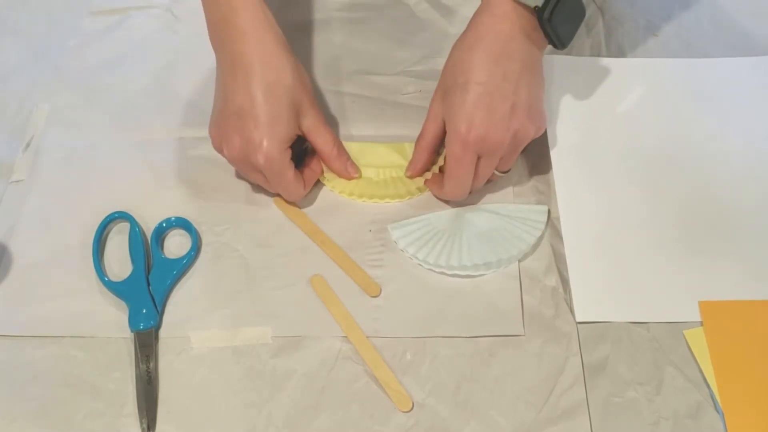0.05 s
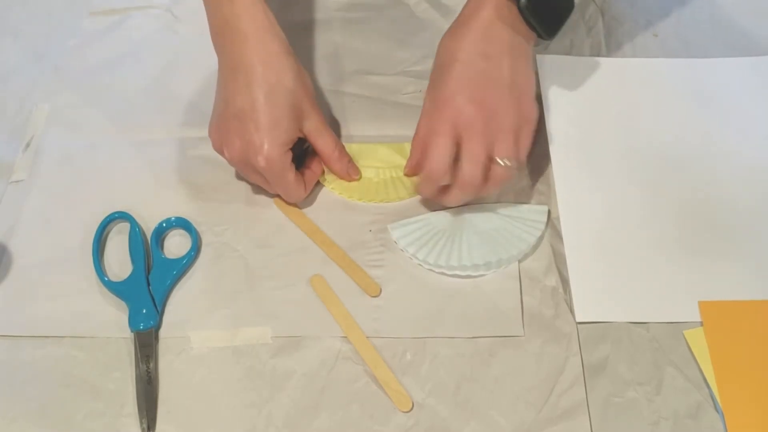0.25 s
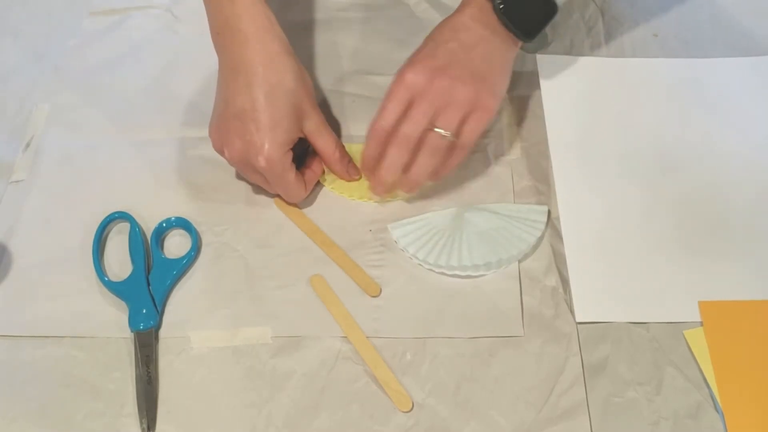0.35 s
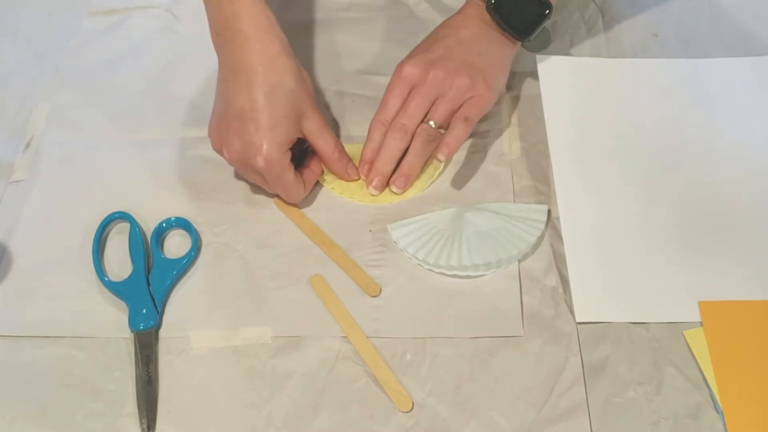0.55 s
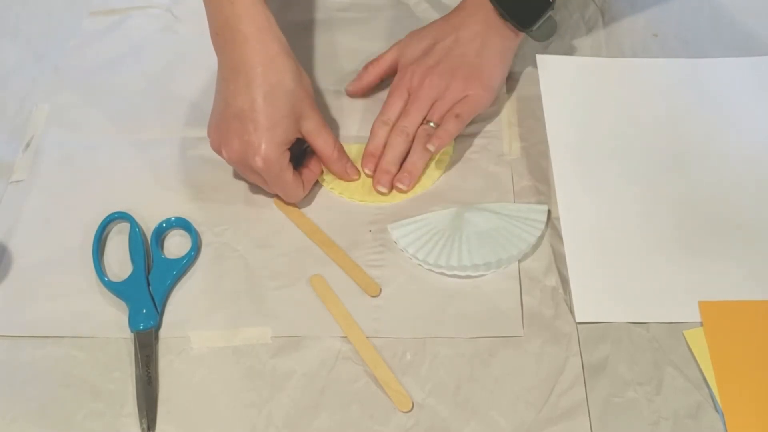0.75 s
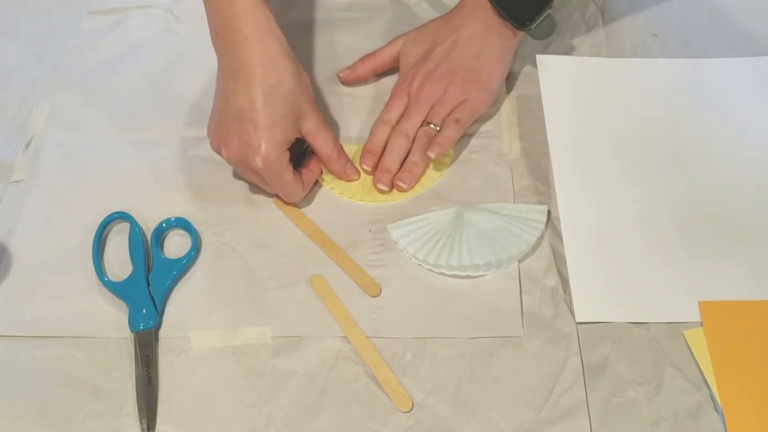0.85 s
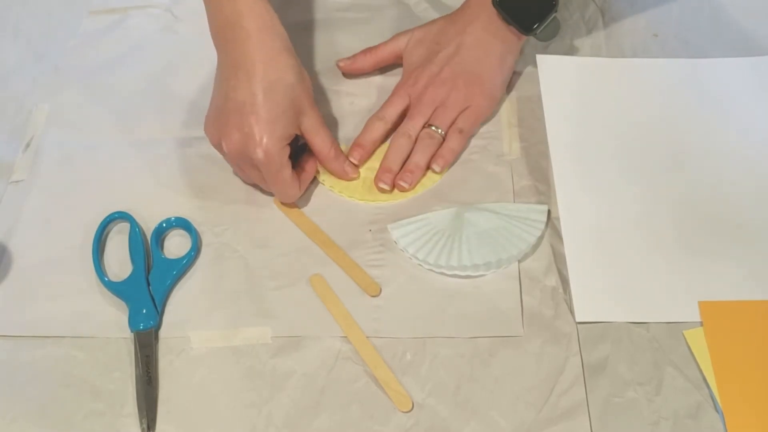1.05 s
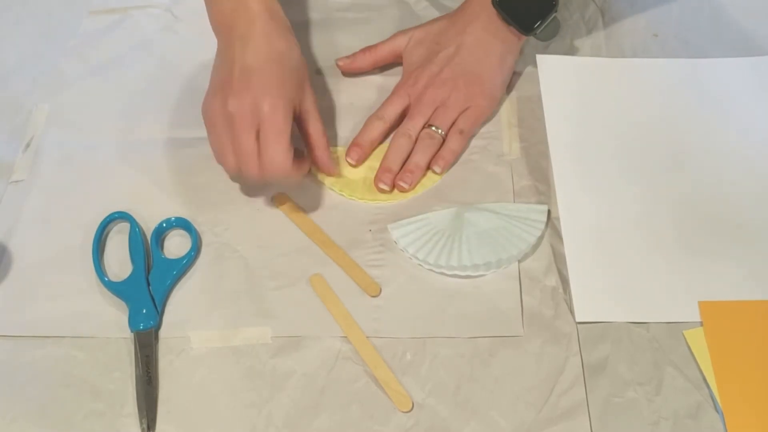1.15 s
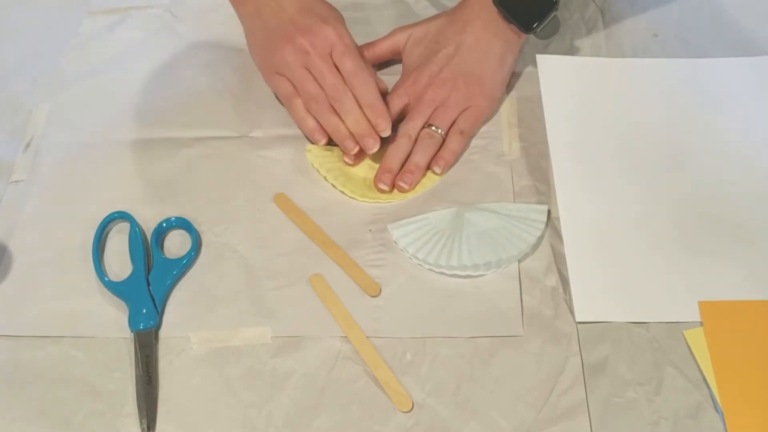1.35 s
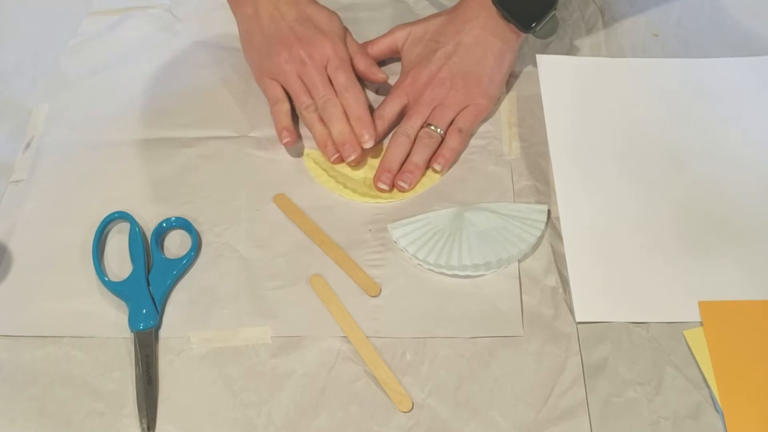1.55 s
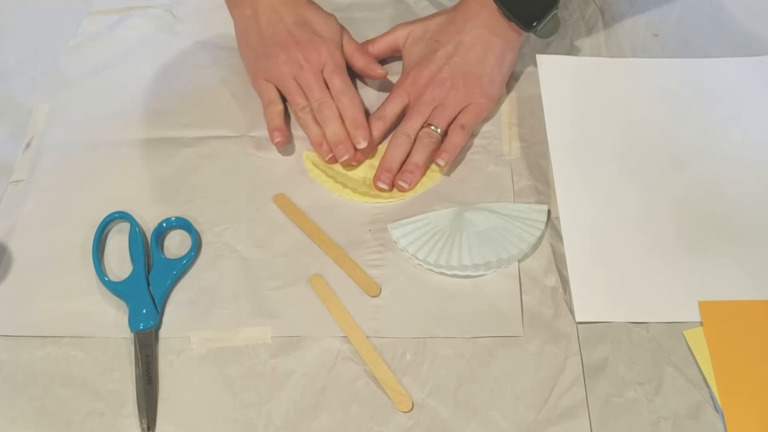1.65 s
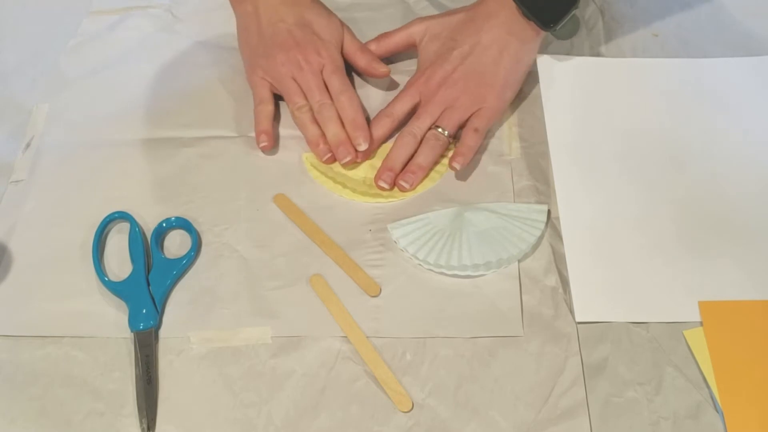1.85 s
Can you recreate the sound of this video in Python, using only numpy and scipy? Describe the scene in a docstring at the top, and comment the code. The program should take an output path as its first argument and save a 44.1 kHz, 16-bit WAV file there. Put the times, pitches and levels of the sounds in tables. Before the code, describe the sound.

A thin pleated paper cup crinkles as hands fold it on a table. Small sharp snaps cluster early, then lighter crackles and rubbing follow as fingers flatten it. It sounds close, in a quiet room with faint ventilation hum.

```python
"""A thin pleated paper cup is folded by hand and pressed flat on a table in a quiet room.
Pleats buckle with sharp snaps; fingers sliding over the paper raise a fine rustle of tiny crackles,
a dull rub against the table and a few short rasps along the folds.
Nearby surfaces return quick echoes, the room adds a short tail, and ventilation hums underneath."""
import sys
import numpy as np
from scipy import signal
from scipy.fft import rfft, irfft
from scipy.io import wavfile

SR = 44100
rng = np.random.default_rng(int(sys.argv[2]) if len(sys.argv) > 2 else 0)


def digitize_waveform(pressure):
    """Quantize a signal to 16-bit integers and store it at the path in sys.argv[1].

    Rows of a 2-D input are taken as channels; values are limited to [-1, 1].
    """
    field = np.atleast_2d(pressure).T
    bounded = np.clip(field, -1, 1)
    quanta = np.round(bounded * 32767).astype(np.int16)
    wavfile.write(sys.argv[1], SR, quanta)


N = 83790

# Buckling pleats: t/s, level/dB in each of five bands (before the band trims), pan/dB (left over right)
SNAPS = [(0.0742, -69, -61, -59, -70.0, -70.0, 5.0), (0.1008, -81.0, -63, -58, -64, -65, 8),
         (0.1274, -75, -66, -65, -72.0, -69, 6.0), (0.1441, -54, -52, -49, -45.5, -42, 3.0),
         (0.184, -47.5, -47, -74, -56, -54, 4.5), (0.198, -51, -47, -57, -50, -51, 1),
         (0.2171, -57, -48.5, -53, -49, -49, -3), (0.3916, -65, -31.5, -41, -40.5, -48, 3.5),
         (0.4115, -44.0, -42, -37, -42, -44, 14), (0.4189, -45, -46, -33, -40.0, -40, 1.0),
         (0.4232, -57, -37.5, -32, -38, -28, 3), (0.4332, -34.5, -28.0, -23.5, -26.5, -22.0, -2.5),
         (0.4942, -40, -29.0, -23.5, -30, -25.5, 5), (0.5489, -48, -41.5, -34, -42.0, -47, 1),
         (0.614, -47.5, -32.5, -30, -35, -37, 1.5), (0.6812, -38.5, -43, -34, -33, -49, 1.5),
         (0.6928, -39.5, -39, -50, -40, -49, -1), (0.7417, -54, -51, -48, -48.0, -50, 1),
         (0.7975, -51, -50.5, -44, -45, -50.0, -1), (0.8295, -50.5, -46, -57, -59, -50.0, 0),
         (0.8688, -56.0, -48, -55.0, -68, -59, 4), (0.8991, -49.0, -39, -37.5, -35.5, -42, 2.0),
         (0.913, -45.5, -47, -58, -55, -34, 4.5), (0.9238, -46.5, -39.5, -57, -50.0, -53, -4),
         (0.951, -48, -40, -55, -38.5, -36.5, 0), (0.9687, -74, -44.5, -43.5, -53, -44, 5),
         (1.0168, -55, -45.0, -46, -58, -57, 3.0), (1.0333, -73, -56, -60, -57, -66.0, -2),
         (1.059, -70, -44, -46, -51, -58, 1), (1.1166, -65, -38.5, -35, -42, -37.5, -7),
         (1.163, -48, -48, -45.0, -44.5, -42, -2), (1.2191, -40.5, -37, -28.5, -35.0, -31, 2.5),
         (1.2805, -74, -49, -47, -45, -47, 0), (1.304, -43.5, -36.5, -30.5, -34, -31, 3.5),
         (1.5309, -47.5, -38, -37, -41, -44, -9), (1.5351, -42.5, -32.5, -28.0, -33, -34.5, 6),
         (1.655, -57.0, -56, -40, -57, -51, 6.5)]
# Edges of the five snap bands: f/Hz
SNAP_EDGES_HZ = [1900, 3450, 6300, 8500, 11500, 16000]
# Trim of each band, common to all snaps: level/dB
SNAP_TRIMS_DB = [-0.71, 0.92, -1.6, -0.58, 0.56]
# Finger strokes, before the trims: start t/s, end t/s, attack t/s, rustle level/dB, rub level/dB,
# sheen level/dB (relative to the rustle, above SHEEN_HZ)
STROKES = [(-.03, 0.015, .004, -53, -60.5, -2), (0.016, 0.145, .01, -67, -70, 0),
           (0.132, .198, 0.0069, -58, -66.5, 2), (0.19, 0.254, 0.014, -48.5, -59.5, 5.5),
           (0.353, .392, .025, -53.5, -74, -1.5), (0.387, 0.413, .004, -51, -51, 6),
           (0.405, 0.426, .005, -38.5, -46, 9), (0.442, 0.465, 0.0035, -33, -53.5, -6),
           (0.48, 0.56, 0.0036, -46.5, -61, 4), (0.615, 0.68, 0.0093, -49.5, -58, 10.5),
           (0.659, 0.707, 0.0031, -43.5, -56, 6), (0.71, 0.878, 0.0088, -53, -62, -3),
           (0.894, 0.982, 0.0039, -48.5, -59.5, -4), (0.988, 1.11, .01, -52, -65.5, -0.5),
           (1.103, 1.16, 0.011, -47, -55.5, 9), (1.155, 1.167, .005, -40.5, -53.5, 4),
           (1.178, 1.227, 0.0043, -47.5, -59, 3), (1.256, 1.34, 0.011, -54, -67.5, 5.5),
           (1.366, 1.403, 0.036, -53, -71.5, 2), (1.418, 1.53, 0.033, -55.5, -71.5, 7),
           (1.519, 1.56, 0.0083, -50, -59.5, 12), (1.566, 1.691, 0.0085, -69.5, -71.5, 10),
           (1.748, 1.93, 0.063, -62, -82, 2.5)]
# Bright colour of fingers on paper: f/Hz, relative level/dB
RUSTLE_EQ = [(1500, -24), (2800, -11.5), (4500, 3), (6000, -2.5), (7300, 5), (9500, -4.5), (12000, 1),
             (15000, -0.5), (17000, -10.5)]
# Dull colour of paper on the table: f/Hz, relative level/dB
RUB_EQ = [(250, 1), (500, 14.5), (800, 11.5), (1200, 8.5), (1600, 9.5), (2200, 8.5), (3000, 11.5),
          (4500, 8), (9000, -30)]
# Folds rasping under the fingers: start t/s, end t/s, f/Hz, level/dB
RASPS = [(0.169, 0.169, 1500, -51.5), (0.197, 0.245, 2000, -64.5), (0.389, 0.407, 2030, -45.5),
         (0.684, 0.698, 2550, -51), (1.157, 1.169, 1330, -53), (1.537, 1.542, 3240, -45)]
# Echoes off nearby surfaces: delay t/s, level/dB relative to the direct sound
ECHOES = [(.0043, -10), (.0075, -12), (.0122, -19)]
# Decay of the room tail: f/Hz, t/s to fall 60 dB
ROOM_T60 = [(500, 0.89), (2000, 0.49), (7000, 0.33), (15000, 0.3)]
# Colour of the ventilation's rush: f/Hz, relative level/dB
AIR_EQ = [(25, -17), (40, -14), (56, 0.7), (85, -7), (120, 0.1), (170, 0), (205, -4), (330, -4), (520, -10),
          (650, -16), (850, -17), (1050, -28), (1600, -30), (2400, -36), (7000, -37), (16000, -41)]
# Ventilation tones: f/Hz, level/dB, half-width f/Hz
HUM_TONES = [(117.9, -61, 13), (152.9, -51.5, 3.5), (182.6, -66, 18), (233.7, -60, 21), (336.6, -64, 7.2),
             (402.9, -67.5, 2), (461, -69.5, 18), (841.2, -67, 3.3)]
# Stereo image of the ventilation: f/Hz, left-right likeness (0 wide, 1 mono)
AIR_LIKENESS = [(30, 0.38), (70, .9), (140, 0.96), (280, 0.7), (600, 0.38), (1500, 0.083), (8000, 0.076)]

SNAP_RISE_S, SNAP_DECAY_S, SNAP_LEVEL_S = .00022, .00062, .002
THUD_LOW_HZ, THUD_HIGH_HZ, THUD_DB = 550, 1900, -8.5  # level relative to the untrimmed lowest band
RUSTLE_TRIM_DB, RUSTLE_PER_S, RUSTLE_SPREAD_DB, RUSTLE_PAN_DB = -4, 6500, -0.5, 1.7
RUB_TRIM_DB, RUB_PER_S, RUB_SPREAD_DB = 0.5, 2500, 3
SHEEN_HZ, RASP_WIDTH_HZ = 9250, 440
TAIL_DB, TAIL_ONSET_S, ECHO_SMEAR_S = -6, 0.0026, .0002
AIR_DB, HUM_WAVER = -53.5, 0.57


def pleat_snaps():
    """Each buckle shakes the sheet for about a millisecond, in its own colour, and taps the table."""
    out, t = np.zeros((2, N + SR)), np.arange(512) / SR
    envelope = (1 - np.exp(-t / SNAP_RISE_S)) * np.exp(-t / SNAP_DECAY_S)
    bands = [*zip(SNAP_EDGES_HZ, SNAP_EDGES_HZ[1:]), (THUD_LOW_HZ, THUD_HIGH_HZ)]
    for start_s, *colour_db, pan_db in SNAPS:
        start = int(start_s * SR)
        levels_db = [*np.add(colour_db, SNAP_TRIMS_DB), colour_db[0] + THUD_DB]
        for (low, high), db in zip(bands, levels_db):
            noise = stereo(rng.standard_normal((2, len(t))), likeness=.45)
            burst = band(noise * envelope, low, high, order=3)
            # rms as if all the energy fell within SNAP_LEVEL_S
            level = np.sqrt(np.sum(burst ** 2, axis=1, keepdims=True) / (SNAP_LEVEL_S * SR))
            out[:, start:start + len(t)] += from_db(db) * pan(pan_db) * burst / level
    return out[:, :N]


def finger_strokes():
    """Every stroke makes the paper rustle and rubs it against the table."""
    body_gain, sheen_gain, rub_gain = 0, 0, 0
    for start, end, attack_s, rustle_db, rub_db, sheen_db in STROKES:
        force = pressure(start, end, attack_s)
        body_gain = np.maximum(body_gain, force * from_db(rustle_db + RUSTLE_TRIM_DB))
        sheen_gain = np.maximum(sheen_gain, force * from_db(rustle_db + RUSTLE_TRIM_DB + sheen_db))
        rub_gain = np.maximum(rub_gain, force * from_db(rub_db + RUB_TRIM_DB))
    crackle = grains(RUSTLE_PER_S, RUSTLE_SPREAD_DB, RUSTLE_EQ)
    body = signal.sosfiltfilt(signal.butter(2, SHEEN_HZ, fs=SR, output="sos"), crackle)
    sheen = crackle - body
    rub = grains(RUB_PER_S, RUB_SPREAD_DB, RUB_EQ)
    return pan(RUSTLE_PAN_DB) * (body_gain * body + sheen_gain * sheen + rub_gain * rub)


def fold_rasps():
    """Slips along a fold excite one broad resonance, giving each rasp its pitch."""
    slips = grains(RUB_PER_S, RUB_SPREAD_DB, RUB_EQ)
    out = 0
    for start, end, hz, db in RASPS:
        resonance = band(slips, hz - RASP_WIDTH_HZ / 2, hz + RASP_WIDTH_HZ / 2, order=1)
        out += from_db(db) * pressure(start, end, attack_s=.004) * rms_one(resonance)
    return out


def pressure(start, end, attack_s, release_s=0.014):
    """Envelope of a finger's push: rise, hold, let go."""
    t = np.arange(N) / SR
    return np.clip((t - start) / attack_s, 0, 1) * np.exp(-np.maximum(t - end, 0) / release_s)


def grains(per_s, spread_db, eq):
    """Friction texture: dense tiny slips of uneven size, at unit rms."""
    triggers = rng.random(N) < per_s / SR
    sizes = from_db(spread_db * np.minimum(rng.exponential(1, N), 5))
    noise = stereo(rng.standard_normal((2, N)), likeness=0.27)
    return colour(noise * triggers * sizes, eq)


def room(x):
    """Direct sound, three quick scattered echoes and a diffuse tail that dies sooner in the treble."""
    t, edges_hz = np.arange(SR // 2) / SR, np.geomspace(200, 18000, 10)
    tail = 0
    for low, high in zip(edges_hz, edges_hz[1:]):
        decay = from_db(-60 * t / at_hz(ROOM_T60, np.sqrt(low * high)))
        tail += band(rng.standard_normal((2, len(t))), low, high) * decay
    tail *= 1 - np.exp(-t / TAIL_ONSET_S)
    response = from_db(TAIL_DB) * rms_one(tail) / np.sqrt(len(t))
    response[:, 0] += 1  # direct sound
    for delay, db in ECHOES:
        smear = (t >= delay) * np.exp(-abs(t - delay) / ECHO_SMEAR_S)
        scatter = rng.standard_normal((2, len(t))) * smear
        response += from_db(db) * rms_one(scatter) / np.sqrt(len(t))
    return signal.fftconvolve(x, response, axes=1)[:, :N]


def ventilation():
    """A low bed of rushing air with several tones, each partly steady and partly wavering."""
    hz, t = np.arange(N // 2 + 1) * SR / N, np.arange(N) / SR
    likeness = at_hz(AIR_LIKENESS, hz)
    rush = irfft(stereo(rfft(rng.standard_normal((2, N))), likeness), N)
    out = from_db(AIR_DB) * colour(rush, AIR_EQ)
    noise_spectrum = stereo(rfft(rng.standard_normal((2, N))), likeness)
    for tone_hz, db, half_width_hz in HUM_TONES:
        steady = np.sqrt(2) * np.sin(2 * np.pi * (tone_hz * t + rng.random()))
        wavering = rms_one(irfft(noise_spectrum / (1 + ((hz - tone_hz) / half_width_hz) ** 2), N))
        out += from_db(db) * (np.sqrt(1 - HUM_WAVER ** 2) * steady + HUM_WAVER * wavering)
    return out


def from_db(db):
    """Decibels to gain."""
    return 10 ** (np.asarray(db) / 20)


def rms_one(x):
    """Normalise to unit rms."""
    return x / np.sqrt(np.mean(x ** 2) + 1e-20)


def at_hz(points, hz):
    """Read a curve on a log-frequency axis."""
    knots_hz, values = np.transpose(points)
    return np.interp(np.log(np.maximum(hz, 1)), np.log(knots_hz), values)


def colour(x, eq):
    """Apply an EQ curve and normalise to unit rms."""
    hz = np.arange(N // 2 + 1) * SR / N
    return rms_one(irfft(rfft(x) * from_db(at_hz(eq, hz)), N))


def stereo(pair, likeness):
    """Mix two unrelated signals as mid and side; more likeness narrows the image."""
    mid, side = pair
    likeness = np.clip(likeness, 0, .99)
    return np.sqrt(1 + likeness) * mid + np.sqrt(1 - likeness) * side * np.array([[1], [-1]])


def pan(db):
    """Channel gains that put the left db above the right."""
    return from_db([[db / 2], [-db / 2]])


def band(x, low, high, order=2):
    """Causal band-pass."""
    return signal.sosfilt(signal.butter(order, [low, high], "band", fs=SR, output="sos"), x)


def scene():
    """The paper in the room, over the ventilation bed."""
    return room(pleat_snaps() + finger_strokes() + fold_rasps()) + ventilation()


def record(dry):
    """A steep high cut at 16.1 kHz."""
    return signal.sosfilt(signal.ellip(10, .2, 70, 16100, fs=SR, output="sos"), dry)


dry = scene()
out = record(dry)
digitize_waveform(out)
```